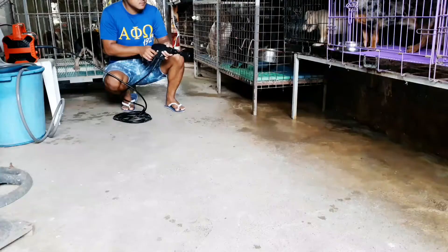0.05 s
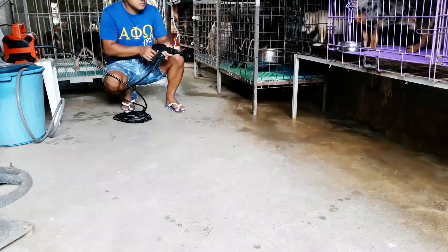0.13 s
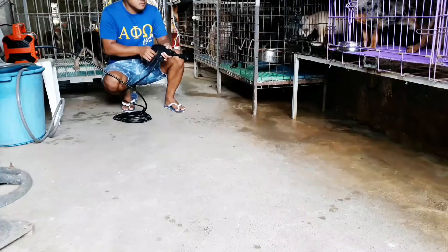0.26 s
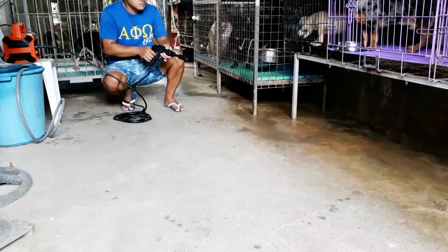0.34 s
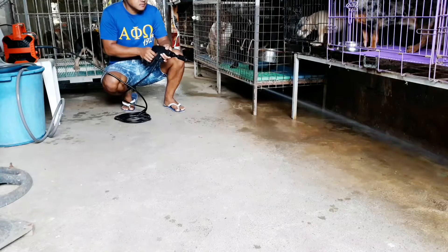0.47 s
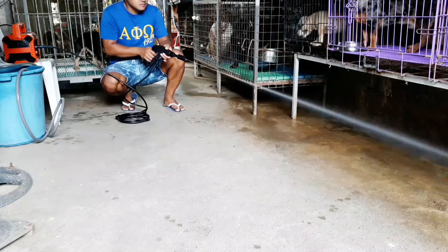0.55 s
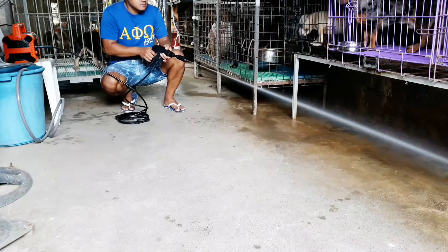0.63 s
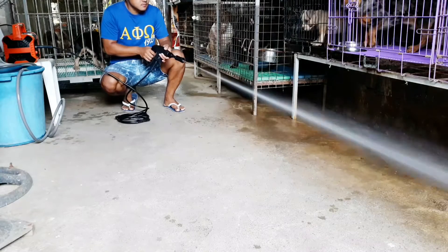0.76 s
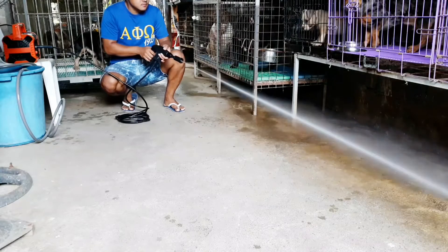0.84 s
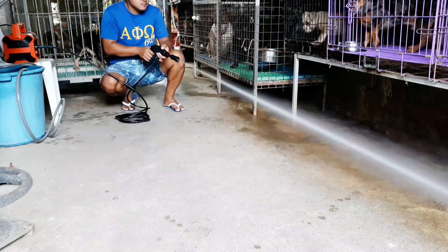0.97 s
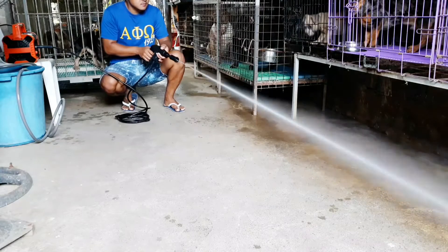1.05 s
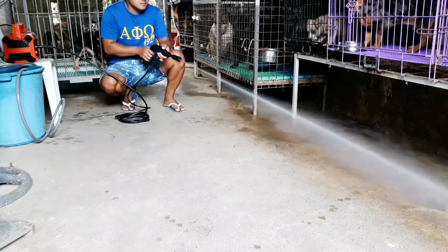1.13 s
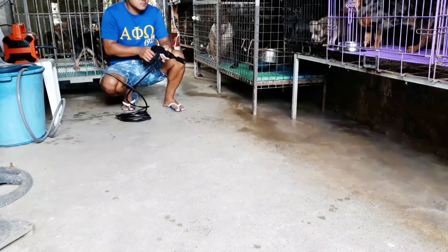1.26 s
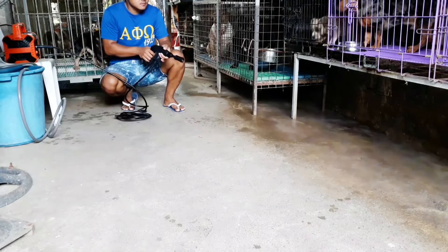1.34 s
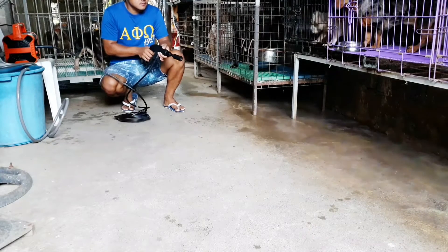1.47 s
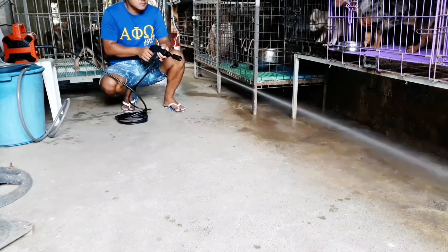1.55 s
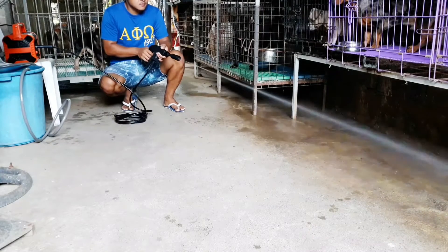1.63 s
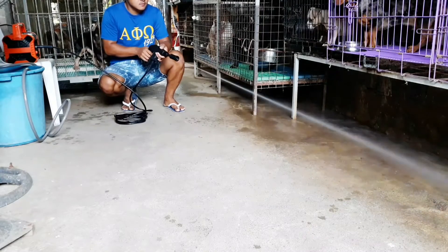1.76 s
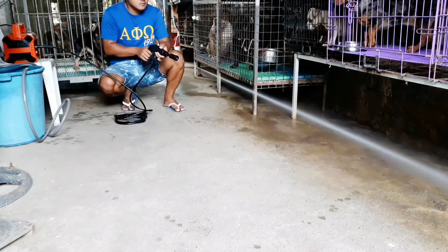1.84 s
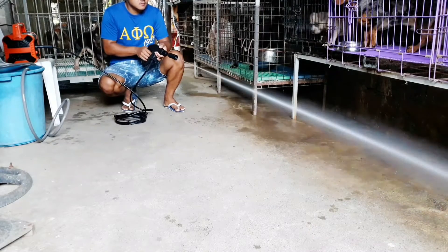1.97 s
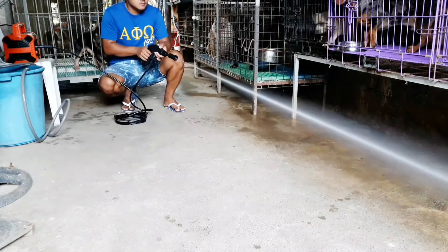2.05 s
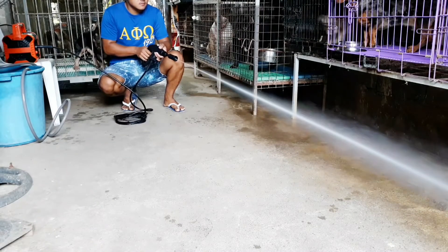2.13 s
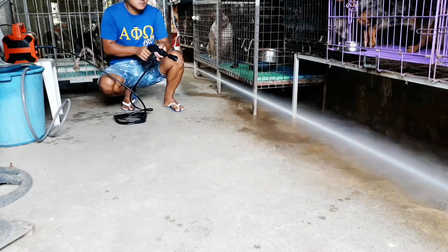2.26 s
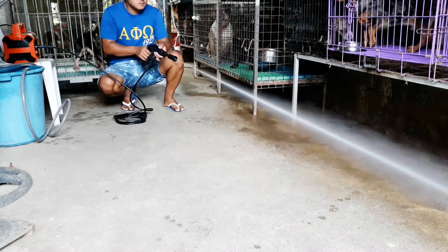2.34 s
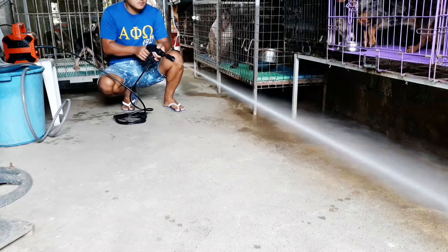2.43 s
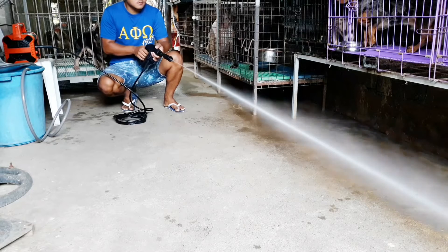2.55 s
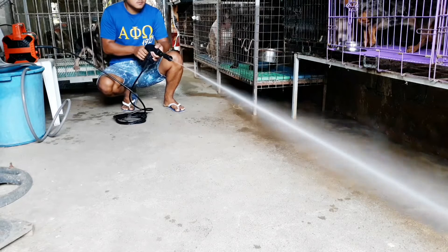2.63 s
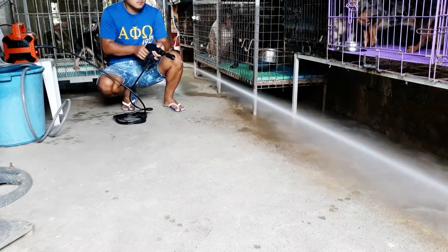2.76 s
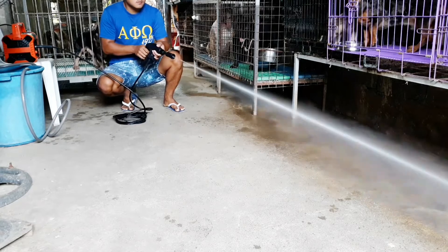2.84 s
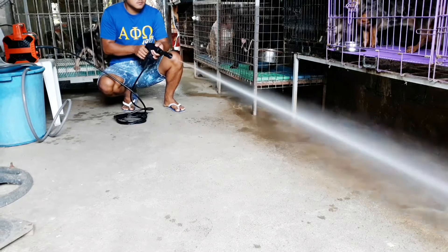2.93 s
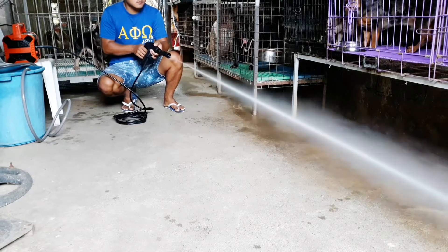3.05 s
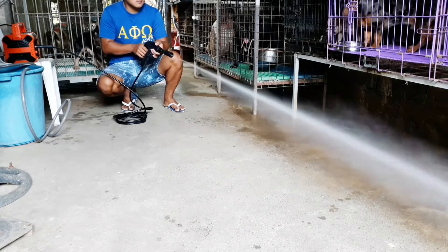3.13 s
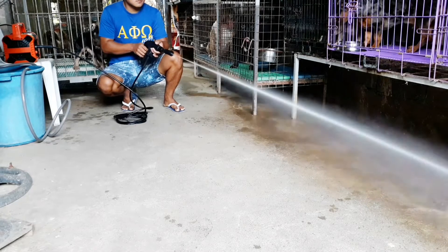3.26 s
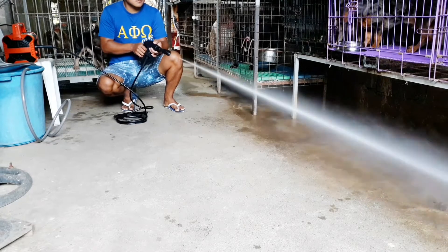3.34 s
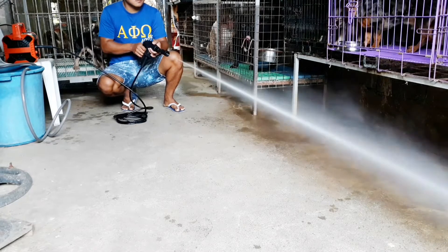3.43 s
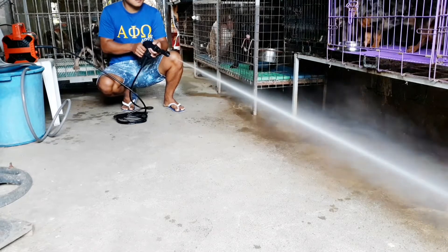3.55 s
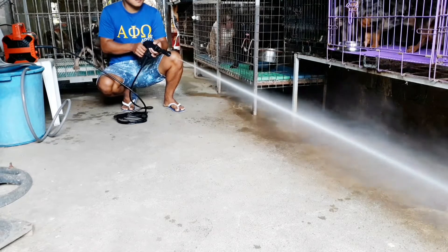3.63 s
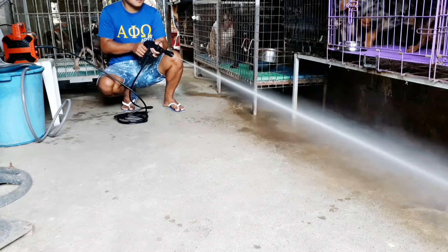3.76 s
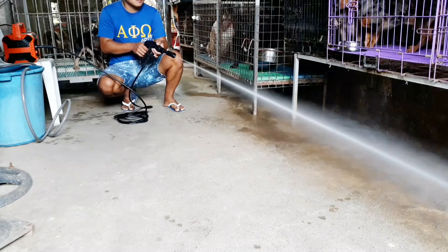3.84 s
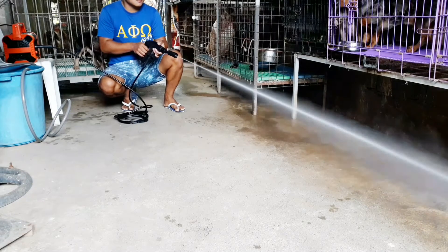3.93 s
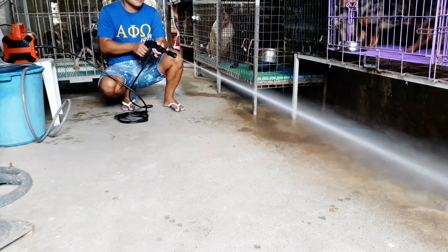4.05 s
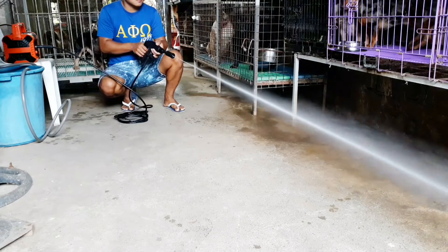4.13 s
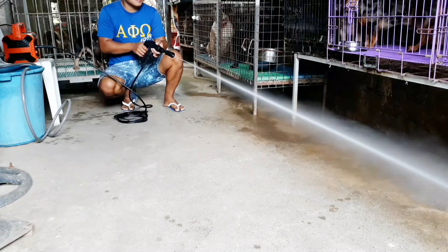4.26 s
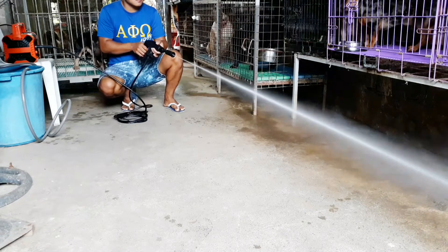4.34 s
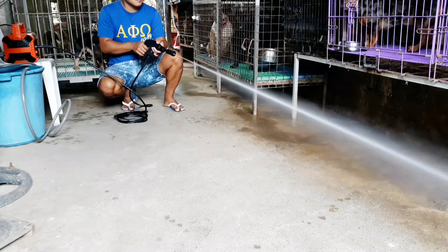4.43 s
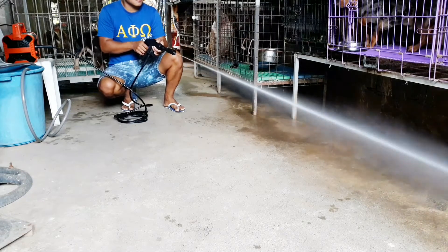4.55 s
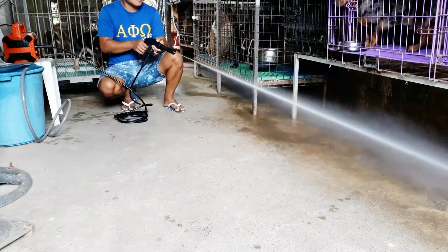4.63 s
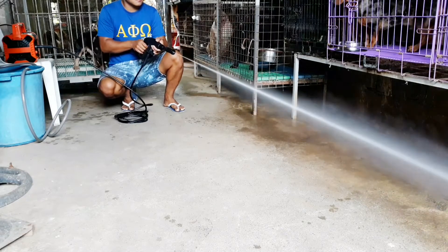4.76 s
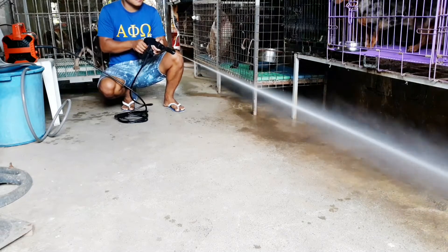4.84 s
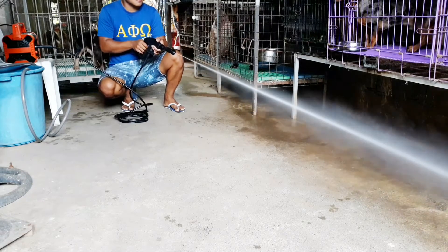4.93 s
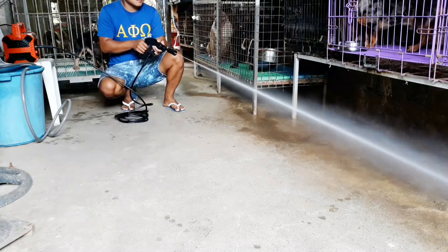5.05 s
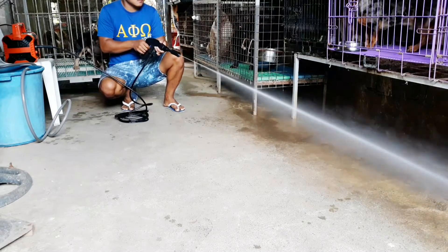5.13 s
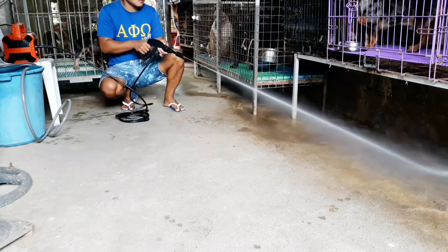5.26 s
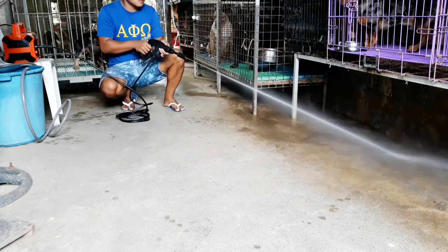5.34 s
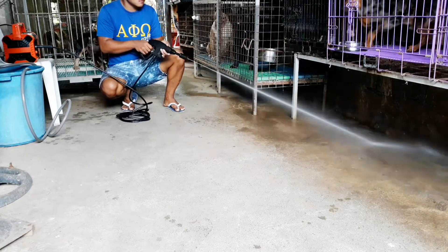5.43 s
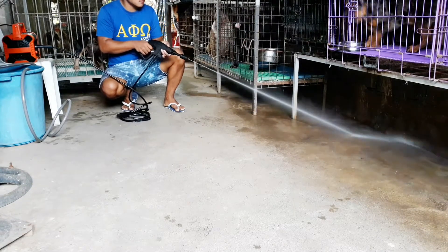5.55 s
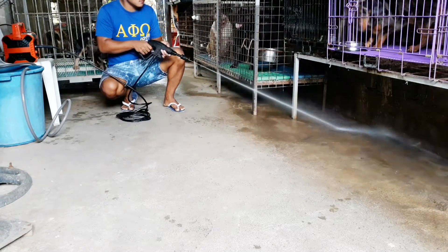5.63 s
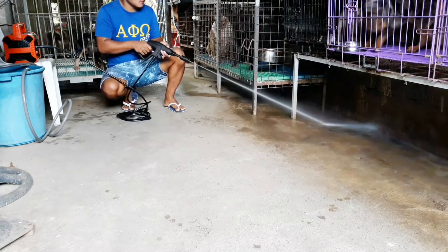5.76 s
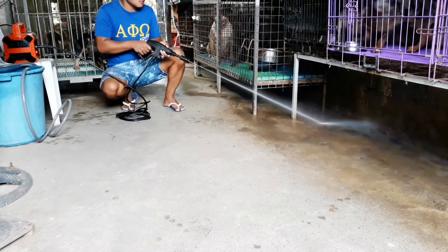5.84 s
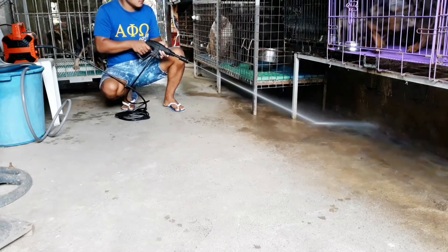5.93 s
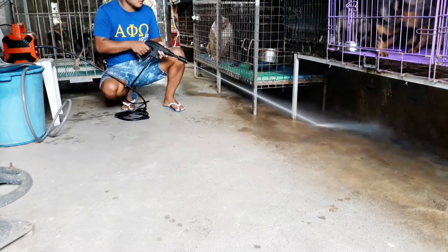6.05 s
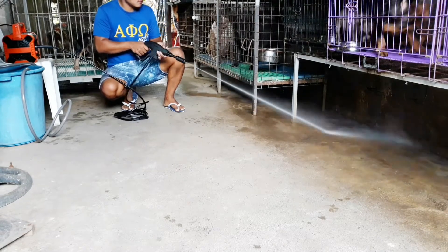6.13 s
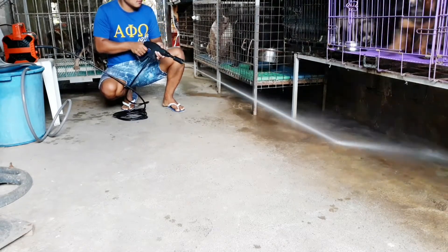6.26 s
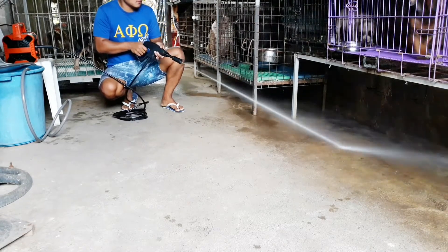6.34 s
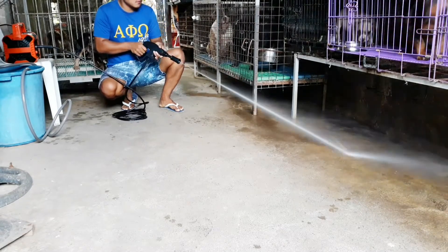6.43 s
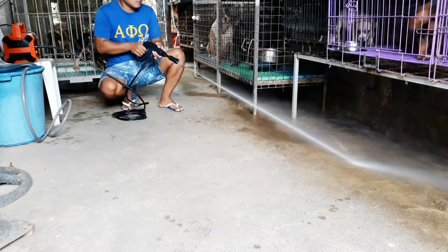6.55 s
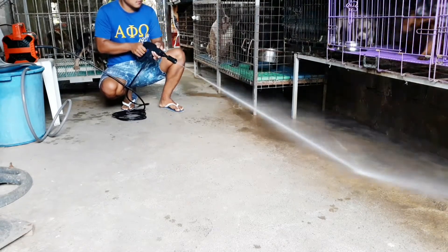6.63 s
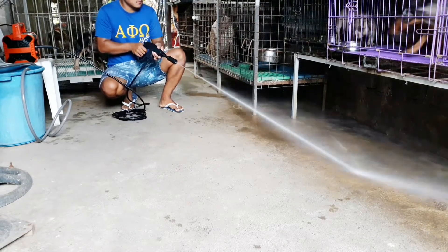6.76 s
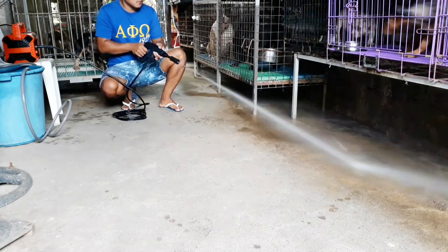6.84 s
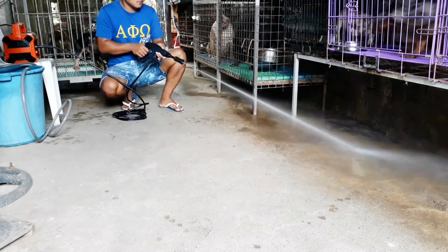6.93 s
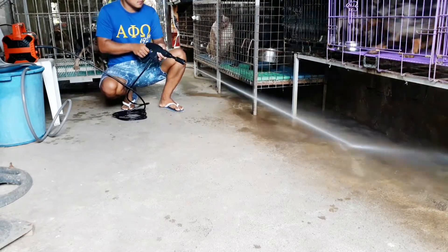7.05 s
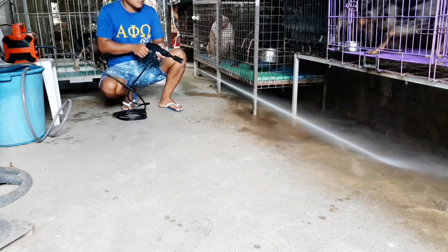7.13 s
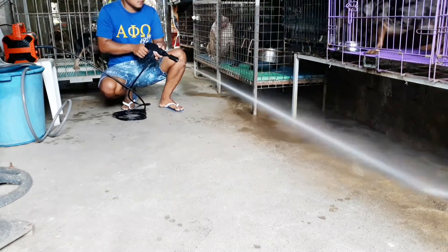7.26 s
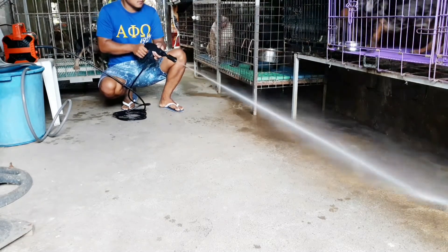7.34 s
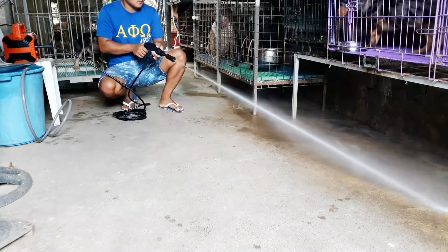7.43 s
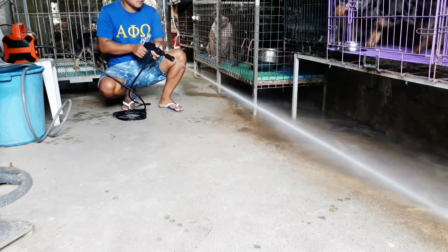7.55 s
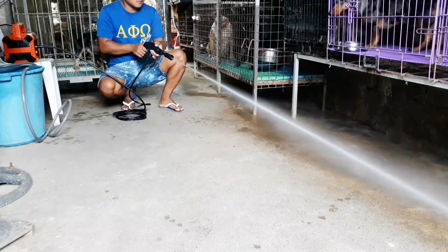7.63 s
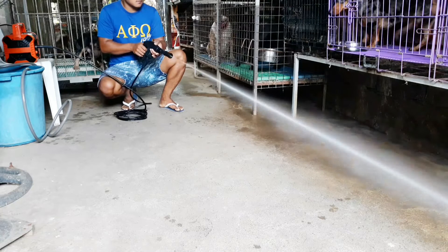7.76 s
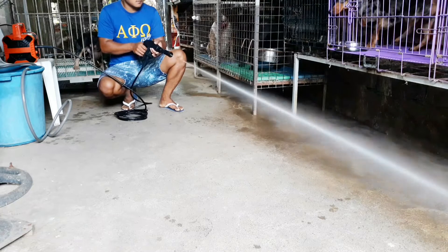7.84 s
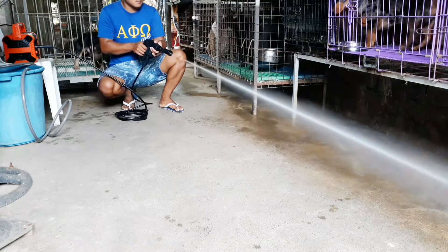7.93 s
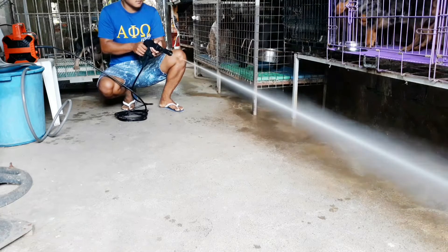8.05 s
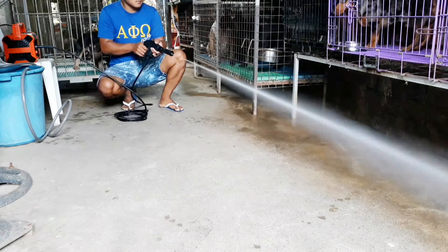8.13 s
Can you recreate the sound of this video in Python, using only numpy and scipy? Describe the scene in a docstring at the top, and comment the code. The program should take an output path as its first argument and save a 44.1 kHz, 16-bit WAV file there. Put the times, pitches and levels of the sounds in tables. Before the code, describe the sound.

A loud, close pressure washer runs at high speed for under 0.2 seconds, a tonal whine over rough noise, then stops dead. A quiet low yard murmur remains, with a tiny scuff near 0.3 and another at 0.5 as the trigger is squeezed. At about 0.55, farther away, the electric motor starts with a soft thump and a fast rising whine, joined by water hiss. Around 1.4 the trigger closes with a low bump and the whine slides down, echoing off concrete. At 1.84 it restarts, climbing quickly and settling by 2.4 into a steady buzzing drone with pump rattle, wavering gear whine and jet hiss, sagging very slightly in pitch. From 5.2 to 7.4 a brighter, airy splash swells as the jet hits the floor nearby, strongest around 6, with soft low wind bumps between 5.4 and 6.1. The machine continues steadily until about 8.2.

```python
"""An electric pressure washer in a concrete kennel yard: a brush motor drives a three-piston pump by an 11:50 gear.
First it runs fast close by, as steady tones over noise, then an abrupt hush leaves filtered noise and two scuffs.
From further off the trigger opens and the motor runs up, its tones following the shaft speed; it coasts down
when the trigger closes, restarts and settles under the jet's hiss. Later the jet strikes the floor nearby, as a
second band of noise, amid soft low bumps of wind; the machine then runs steadily to the end."""
import sys
import numpy as np
from scipy import signal
from scipy.fft import rfft, irfft, next_fast_len
from scipy.io import wavfile
from scipy.ndimage import uniform_filter1d

SR = 44100
rng = np.random.default_rng(int(sys.argv[2]) if len(sys.argv) > 2 else 0)


def bounce(signal):
    """Save signal as a 16-bit WAV file at the path given by the first command-line argument."""
    frames = np.transpose(np.atleast_2d(signal))
    limited = np.clip(frames, -1, 1)
    pcm = np.round(limited * 32767).astype(np.int16)
    wavfile.write(sys.argv[1], SR, pcm)


N = 361179

FULL_SPEED_HZ = 370  # reference motor speed, turns a second
PINION, WHEEL = 11, 50  # gear teeth
GEAR = PINION / WHEEL  # pump turns per motor turn
PARTNER = 58  # cycles of the partner whine per pump turn
BARS = 22  # cycles of the bar whine per motor turn


def undb(db):
    """Decibel law: amplitude ratio of a level in dB."""
    return 10 ** (np.asarray(db) / 20)


def curve(rows, off=None):
    """Linear interpolation: columns of a (t/s, value, ..) table, one value a sample."""
    t, *columns = np.transpose(rows)
    return [np.interp(np.arange(N) / SR, t, column, off, off) for column in columns]


def noise(colour, lo_hz=0., hi_hz=SR):
    """Spectral shaping: white noise given a (f/Hz, level/dB) colour, with rms 1 between lo and hi."""
    hz, db = np.transpose(colour)
    size = next_fast_len(N)
    f = np.arange(1, size // 2 + 2) * SR / size
    gain = undb(np.interp(np.log(f), np.log(hz), db, -90, -90))
    in_band = (f > lo_hz) & (f < hi_hz)
    gain = gain / np.sqrt(2 * np.sum(gain[in_band] ** 2) / size)
    return irfft(rfft(rng.standard_normal(size)) * gain, size)[:N]


def walk(rate):
    """Low-pass random process: random levels joined smoothly, rate a second; spread near 1."""
    k = int(SR / rate)
    steps = np.repeat(rng.standard_normal(N // k + 1), k)
    return 1.49 * uniform_filter1d(uniform_filter1d(steps, k), k)[:N]


def speed_level(speed):
    """Logarithmic speed measure: dB relative to full speed, with a floor at a tenth of it."""
    return 20 * np.log10(np.maximum(speed / FULL_SPEED_HZ, .1))


# hiss of the jet while starting and stopping, steady afterwards: t/s, level/dB
FLOW = [(.5, -70), (.536, -51), (.63, -44), (.674, -38), (.84, -33), (1.26, -36), (1.35, -42.5),
        (1.404, -37.5), (1.49, -42), (1.59, -48.5), (1.616, -40), (1.684, -45.5), (1.87, -47.5),
        (1.92, -43), (2.09, -36.5), (2.4, -37)]


def washer():
    """Superposition of sources, most following one shaft: hum, whines, rattle, ring, jet, splash and rumble."""
    speed = shaft()
    turns = np.cumsum(speed * (1 + 0.00037 * walk(30))) / SR
    # 0 near the running speed, 1 well away from it, as while the pitch glides
    unsettled = np.clip(np.abs(1 - speed / 373) * 9 - .1, 0, 1)
    jet_db, = curve(FLOW)
    spraying, = curve([(.515, 0.23), (.53, 0.99)])
    spinning, = curve([(.545, 0.13), (.57, 0.94)])
    motor = spinning * (hum(speed, turns) + whines(speed, turns, unsettled))
    # while the pitch glides, the echoes lag behind it and smear the lines into patchy bands
    smear = np.clip(.05 + .85 * unsettled, 0, 1)
    motor = np.sqrt(1 - smear ** 2) * motor + echoes(smear * motor)
    broadband = rattle(speed, turns, jet_db) + ring(speed, jet_db)
    broadband = broadband + jet(jet_db) + splash() + rumble(speed, spinning)
    return motor + spraying * broadband


# pressure switch: on t/s, off t/s (the last at the very end)
POWER = [(.54, 1.39), (1.84, 8.19)]
# speed that the load allows, sagging as the trigger closes and as the motor warms: t/s, f/Hz (turns a second)
LOADED_SPEED = [(1.0, 379), (1.2, 376.3), (1.28, 372.8), (1.33, 365), (1.4, 345), (1.83, 380), (2.4, 378.8),
                (2.6, 376.7), (2.95, 374.7), (4.1, 371.4), (4.45, 371), (4.75, 369.3), (6.1, 369.2),
                (6.95, 370.2)]
RUN_UP_S, COAST_S = .1, .31  # time constants


def shaft():
    """Exponential relaxation: powered, the shaft closes on the loaded speed; unpowered, it coasts towards rest."""
    s = np.arange(N) / SR
    loaded, = curve(LOADED_SPEED)
    speed = np.zeros(N)
    for on, off in POWER:
        i, j = int(on * SR), min(int(off * SR), N - 1)
        speed[i:] = loaded[i:] + (speed[i] - loaded[i]) * np.exp((on - s[i:]) / RUN_UP_S)
        speed[j:] = speed[j] * np.exp((off - s[j:]) / COAST_S)
    return speed


# pump tones before load and speed: multiple of the pump shaft, level/dB
PUMP = [(0.99, -71.5), (3.007, -41), (3.99, -42), (4.986, -42), (5.99, -41.5), (8.04, -58), (9.01, -44.5),
        (10.97, -55.5), (12.01, -50), (13.92, -51.5), (16.08, -56.5), (16.95, -48), (17.94, -53.5),
        (19, -45.5), (19.85, -53), (21.02, -51), (22.08, -51.5), (24.1, -53), (24.87, -48.5), (27.85, -47),
        (28.96, -53), (30.1, -62), (31, -76), (38.1, -52.5), (39.5, -59), (41.8, -48.5), (44.15, -53),
        (46.5, -55), (46, -52), (50.6, -55), (54.9, -46), (56, -47), (64.3, -50), (65, -52), (66.6, -52)]
# unbalance and high motor tones before load and speed: multiple of the motor shaft, level/dB
MOTOR = [(1, -31), (12, -49.5), (13, -54)]
# load on the pump, a kick at each start and slack while coasting: t/s, level/dB (gain of the hum)
LOAD = [(.54, 3), (.6, 5.5), (.69, -2), (.85, 1.5), (.93, 3.5), (1.1, 0), (1.34, 2), (1.44, -2),
        (1.6, -13.5), (1.82, -12), (1.86, 1.5), (1.92, -5), (2.09, -3), (2.19, 2), (2.4, 0.1)]


def hum(speed, turns):
    """Harmonic excitation: pump and motor orders whose strength grows with load and as a power of speed."""
    load_db, = curve(LOAD)
    pump = tones(speed, turns, PUMP, GEAR, waver_db=.6, waver_rate=5)
    motor = tones(speed, turns, MOTOR, 1, waver_db=.7, waver_rate=4)
    return undb(load_db) * (speed / FULL_SPEED_HZ) ** 1.22 * (pump + motor)


def tones(speed, turns, orders, ratio, waver_db, waver_rate):
    """Order tracking: each tone wavers alone, high ones more, and lights up as it crosses a casing resonance."""
    out, coarse = 0, slice(None, None, 64)
    for k, db in orders:
        multiple = k * ratio
        lit = casing(multiple * speed[coarse]) / casing(multiple * FULL_SPEED_HZ)
        lit = np.interp(np.arange(N), np.arange(N)[coarse], lit)
        level = undb(db + waver_db * multiple ** .5 * walk(waver_rate))
        out = out + level * lit * np.sin(2 * np.pi * (multiple * turns + rng.random()))
    return np.sqrt(2) * out


# casing resonances that the tones sweep through: f/Hz, width f/Hz, level/dB
CASING = [(223, 11, 20), (372.2, 12.6, 19), (418, 35, 19), (757, 18, 9.5), (1110, 35, 6), (4450, 280, 12.5),
          (5230, 280, 12)]


def casing(hz):
    """Resonance: gain of the plastic casing, its peaks added in power to a flat response."""
    peaks = sum(undb(db) ** 2 / (1 + (2 * (hz - f) / width) ** 2) for f, width, db in CASING)
    return np.sqrt(1 + peaks)


def through_casing(x):
    """Linear filtering: a sound coloured by the casing resonances."""
    size = next_fast_len(N)
    return irfft(rfft(x, size) * casing(np.arange(size // 2 + 1) * SR / size), size)[:N]


# gear mesh whine before its patchiness: t/s, level/dB
MESH = [(.55, -56), (.68, -36.5), (.95, -37), (1.05, -33), (1.3, -38), (1.45, -40), (1.57, -50),
        (1.62, -40), (1.66, -53), (1.83, -49), (1.88, -53), (1.96, -40.5), (2.2, -41), (2.27, -33.5),
        (2.6, -32), (2.8, -35.5), (3.0, -31.5), (3.4, -42), (3.8, -50), (4.4, -44.5), (4.9, -38.5),
        (5.5, -41), (6.0, -35.5), (6.7, -42.5), (8.19, -43)]
PATCHY_DB = 4.5  # the gliding mesh whine comes and goes
# each whine before its adjustments: level/dB at full speed, level/dB more per extra turn a second
PARTNER_LAW = (-50, 2.1)
BARS_LAW = (-51.5, 1.4)
BARS_GLIDE_DB, BARS_FADE = -37, 1.35  # bars before the casing: level in a glide, power of speed


def whines(speed, turns, unsettled):
    """Periodic contact: mesh, partner and bar whines at fixed multiples of a shaft, rougher off running speed."""
    mesh_db, = curve(MESH)
    mesh_db = mesh_db + PATCHY_DB * unsettled * walk(18)
    speed_db = speed_level(speed)
    extra = np.clip(speed - FULL_SPEED_HZ, 0, 6)
    partner_db = PARTNER_LAW[0] + PARTNER_LAW[1] * extra + speed_db
    bars_db = BARS_LAW[0] + BARS_LAW[1] * extra
    bars_db = bars_db + unsettled * (BARS_GLIDE_DB + BARS_FADE * speed_db - bars_db)
    mesh = rough_whine(turns, PINION, mesh_db, 300, 0.14 + 3 * unsettled)
    partner = rough_whine(turns, PARTNER * GEAR, partner_db, 200, 0.3 + 3 * unsettled)
    bars = rough_whine(turns, BARS, bars_db, 700, .3 + 2.5 * unsettled)
    return mesh + partner + through_casing(bars)


def rough_whine(turns, multiple, db, blur_hz, blur):
    """Random modulation: slow noise shakes a tone's size and phase, so that it spreads into a narrow band."""
    shake = 1 + blur * (walk(blur_hz) + 1j * walk(blur_hz))
    level = undb(db) * np.sqrt(2 / (1 + 2 * blur ** 2))  # same power at any blur
    return level * np.real(shake * np.exp(2j * np.pi * multiple * turns))


YARD_T60_S = .3  # time for the echoes to fall by 60 dB


def echoes(x):
    """Diffuse reverberation: dense reflections off concrete, as loud as the sound that feeds them."""
    s = np.arange(SR // 2) / SR
    tail = rng.standard_normal(len(s)) * np.exp(-np.log(1000) * s / YARD_T60_S)
    return signal.fftconvolve(x, tail / np.sqrt(np.sum(tail ** 2)))[:N]


# rattle colour: f/Hz, level/dB per Hz
RATTLE = [(120, -22), (190, -11), (230, -2), (400, -1), (560, -3), (750, -1), (1500, -1.5), (2600, -2),
          (4000, -0.5), (5200, -38)]
# running level/dB, share of the jet's dB swing that it follows, power of speed
RATTLE_LAW = (-35, 0.81, .25)
RING_LAW = (-35.5, 0.68, .05)
STEADY_JET_DB = -37


def running_level(law, speed, jet_db):
    """Power law: level in dB that follows the jet in part and a power of the speed."""
    db, share, power = law
    return db + share * (jet_db - STEADY_JET_DB) + power * speed_level(speed)


def rattle(speed, turns, jet_db):
    """Amplitude modulation: three pistons knock once a pump turn each, one a little harder, and throb the noise."""
    throb = 1 + 0.13 * np.cos(2 * np.pi * 3 * GEAR * turns) + 0.048 * np.cos(2 * np.pi * GEAR * turns)
    level = undb(running_level(RATTLE_LAW, speed, jet_db) + 0.54 * walk(12))
    return throb * level * noise(RATTLE, 540, 3340)


# ring colour: f/Hz, level/dB per Hz
RING = [(3000, -47), (3600, -19), (4300, 1), (4850, -4), (5300, -4), (5900, -10.5), (7000, -12.5)]
SQUEAL_SHARE = 0.38  # power of the casing gain at the bar pitch that the ring takes on


def ring(speed, jet_db):
    """Resonant response: the casing's ringing noise swells when the bar pitch meets a resonance."""
    squeal = casing(BARS * speed) ** SQUEAL_SHARE
    return squeal * undb(running_level(RING_LAW, speed, jet_db) + 1.0 * walk(14)) * noise(RING)


# jet colour: f/Hz, level/dB per Hz
JET = [(2500, -36), (5000, -1), (6500, -0.5), (8500, 4), (9200, 0.5), (10200, -8), (12000, -4),
       (14500, -2.5), (16000, -5.5)]


def jet(jet_db):
    """Turbulent jet noise: a broad hiss that follows the flow and flickers slightly."""
    return undb(jet_db + 0.5 * walk(15)) * noise(JET, 8950, 15700)


# hiss as the jet strikes the floor nearby: t/s, level/dB
SPLASH = [(5.2, -56), (5.55, -41), (5.75, -34.5), (6.27, -35.5), (6.42, -38), (7.0, -41), (7.4, -58)]
# splash colour: f/Hz, level/dB per Hz
SPLASH_COLOUR = [(4000, -20), (7000, -2), (10000, -2.5), (13000, 0), (16000, -3)]


def splash():
    """Impingement noise: a treble hiss where the jet strikes the floor."""
    splash_db, = curve(SPLASH, -120)
    return undb(splash_db + 1.8 * walk(12)) * noise(SPLASH_COLOUR)


# low thumps as the motor starts and the valve closes, then soft bumps of wind: t/s, level/dB
LOW_BUMPS = [(.578, -47), (1.404, -50), (1.865, -47), (5.39, -54), (5.7, -49), (6.08, -46)]
# rumble colour: f/Hz, level/dB per Hz
RUMBLE = [(18, -60), (30, -45), (45, -20), (80, 0), (110, 1), (160, 0.5), (210, 5), (280, -16)]
BUMP_S, RUMBLE_DB = 0.024, -58  # Gaussian width (peak to 1/e); level at full speed before its gate


def rumble(speed, spinning):
    """Low-frequency excitation: ground noise that grows with speed, and Gaussian swells for thumps and wind."""
    s = np.arange(N) / SR
    shaking = undb(RUMBLE_DB + speed_level(speed) + 3.2 * walk(12)) * spinning
    bumps = sum(undb(db) * np.exp(-((s - at) / BUMP_S) ** 2) for at, db in LOW_BUMPS)
    return (shaking + bumps) * noise(RUMBLE)


# steady tones of the close, fast run: f/Hz, level/dB
CLOSE_TONES = [(516.8, -38), (1023, -41.5), (1249, -39), (1707, -38), (1933, -45), (2046, -42), (2159, -40),
               (2842, -45), (3801, -50), (4037, -47), (4544, -40.5), (4947, -49), (5173, -51), (5889, -54),
               (6223, -45), (6417, -51)]
# colour of its noise: f/Hz, level/dB per Hz
CLOSE_NOISE = [(60, -38), (250, -10.5), (340, 2), (450, 6), (600, -1), (1300, -2.5), (4500, -2),
               (6200, -1.5), (7000, -10), (9000, -10), (10500, -22), (13000, -17), (16000, -23)]
CLOSE_DB, CLOSE_END_S = -27, .168  # noise level, end of the run


def close_run():
    """Additive synthesis: the same machine near and faster, as fixed sines over noise, cut off short."""
    s = np.arange(N) / SR
    whine = 0
    for hz, db in CLOSE_TONES:
        whine = whine + undb(db) * np.sqrt(2) * np.sin(2 * np.pi * (hz * s + rng.random()))
    cut = np.clip((CLOSE_END_S - s) / 0.0011, 0, 1)
    return cut * (whine + undb(CLOSE_DB) * noise(CLOSE_NOISE))


# colour of the quiet yard: f/Hz, level/dB per Hz
YARD = [(24, -47), (40, -36), (96, -1), (402, -4.5), (570, -0.5), (918, -10), (1020, -12), (1240, -15),
        (1340, -15), (5050, -23), (6020, -24), (14800, -41), (16000, -55)]
YARD_DB = -56


def yard():
    """Ambient noise: steady murmur of the surroundings, wavering slightly, with two soft scuffs in it."""
    return undb(YARD_DB + 0.7 * walk(9)) * noise(YARD) + scuffs()


# scuffs, the second as the trigger is squeezed: peak t/s, level/dB, rise dB/s, fall dB/s
SCUFF = [(.28, -51.5, 280, 130), (.495, -47.5, 700, 5)]
# scuff colour: f/Hz, level/dB per Hz
SCUFF_COLOUR = [(710, -42), (1200, -18), (2120, -7), (2420, 0), (2720, -14), (3270, -4), (3790, -8),
                (4530, -5.5), (7000, -30), (9100, -56), (15400, -120)]
SCUFF_END_S = 0.65


def scuffs():
    """Friction noise: coloured bursts with exponential rise and fall."""
    s = np.arange(N) / SR
    envelope = 0
    for at, db, rise, fall in SCUFF:
        envelope = envelope + undb(db - np.where(s < at, rise * (at - s), fall * (s - at)))
    envelope = envelope * np.clip((SCUFF_END_S - s) / .04, 0, 1)
    return envelope * undb(1.9 * walk(37)) * noise(SCUFF_COLOUR)


def scene():
    """Superposition at one point: a single microphone feeds both channels."""
    return np.tile(close_run() + washer() + yard(), (2, 1))


TOP_HZ = 15500


def record(dry):
    """Band limiting: a steep elliptic low-pass cuts the top."""
    return signal.sosfilt(signal.ellip(16, .2, 80, TOP_HZ, fs=SR, output="sos"), dry)


dry = scene()
out = record(dry)
bounce(out)
```